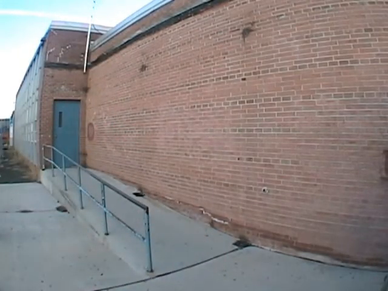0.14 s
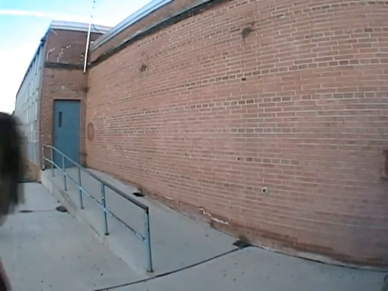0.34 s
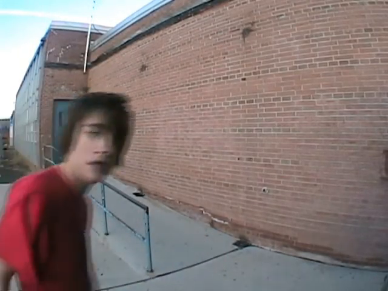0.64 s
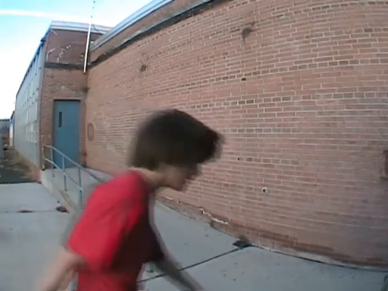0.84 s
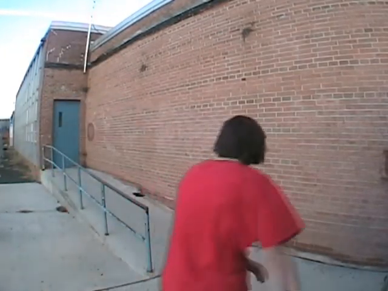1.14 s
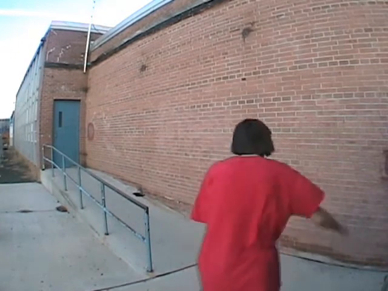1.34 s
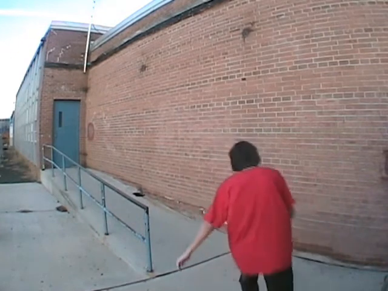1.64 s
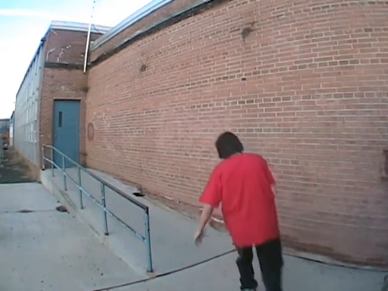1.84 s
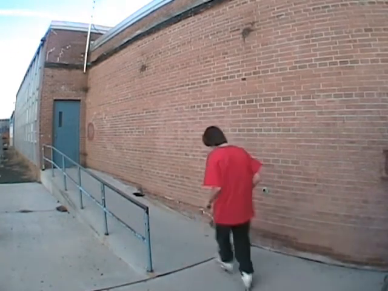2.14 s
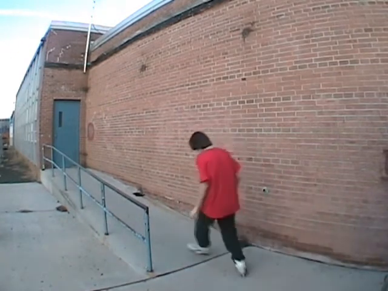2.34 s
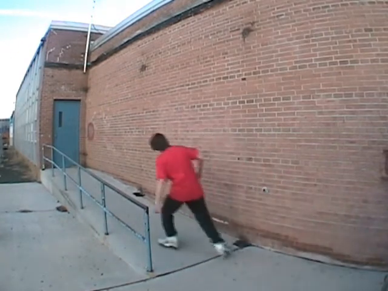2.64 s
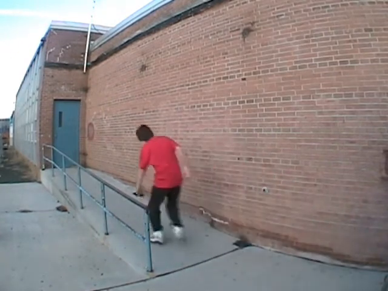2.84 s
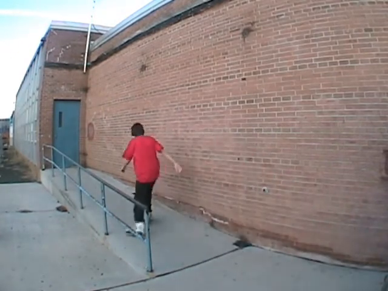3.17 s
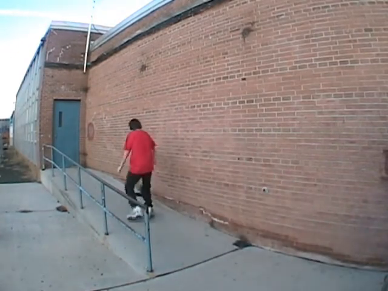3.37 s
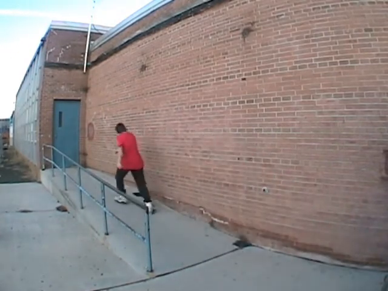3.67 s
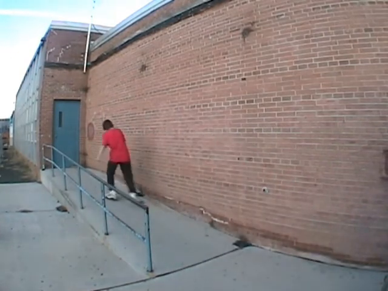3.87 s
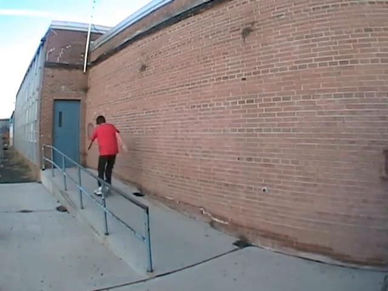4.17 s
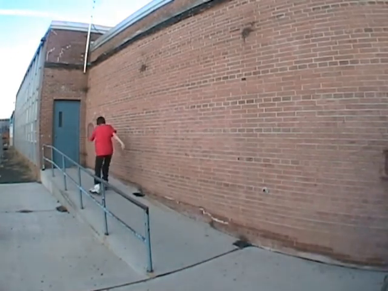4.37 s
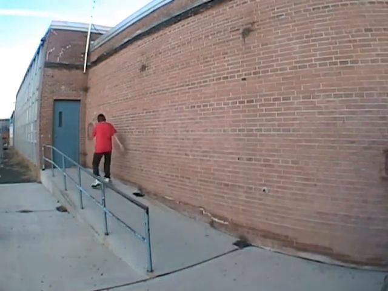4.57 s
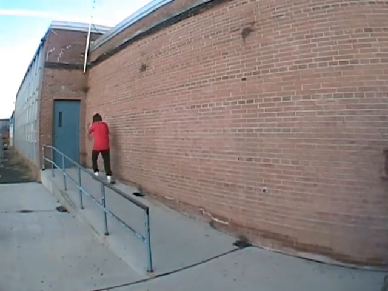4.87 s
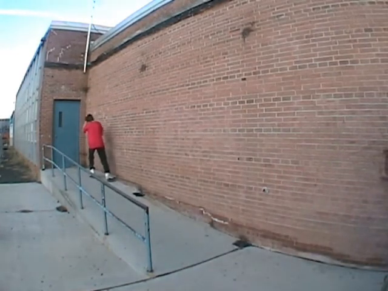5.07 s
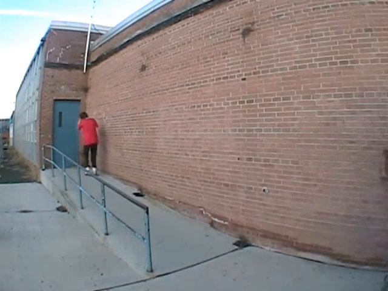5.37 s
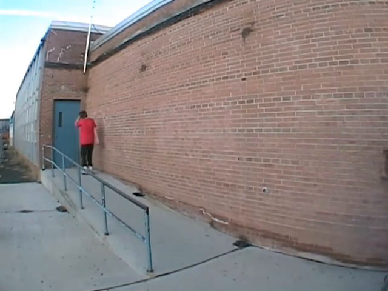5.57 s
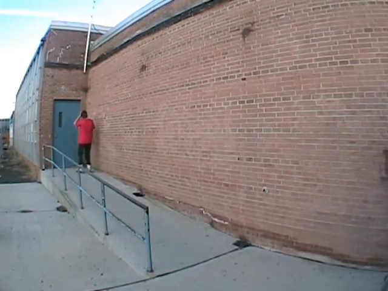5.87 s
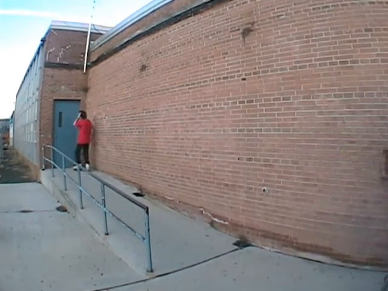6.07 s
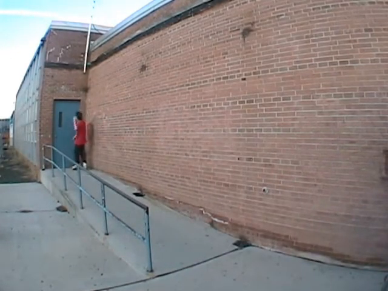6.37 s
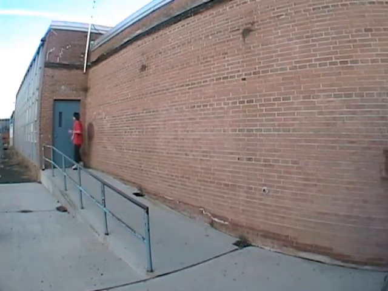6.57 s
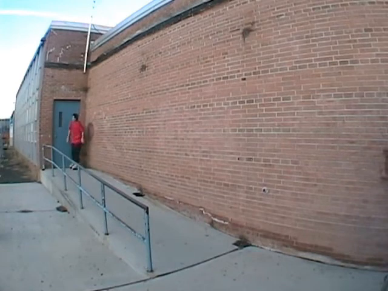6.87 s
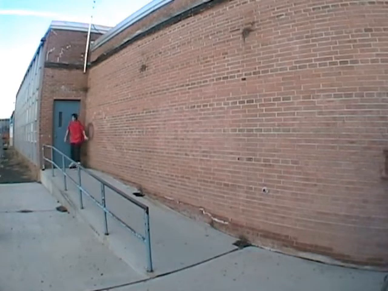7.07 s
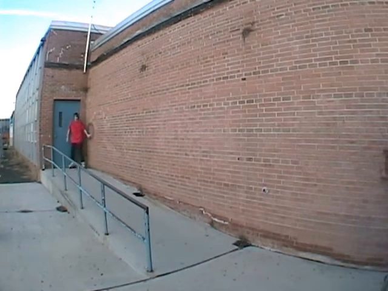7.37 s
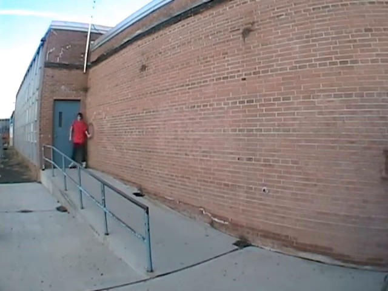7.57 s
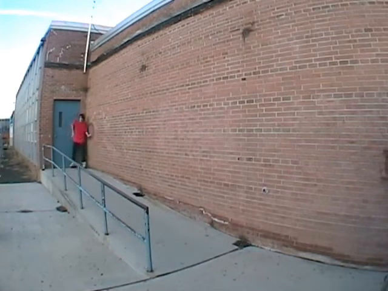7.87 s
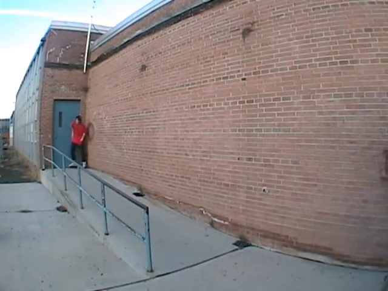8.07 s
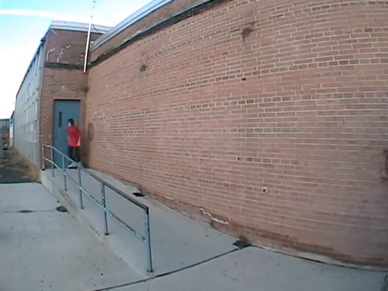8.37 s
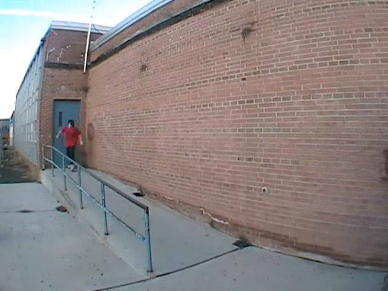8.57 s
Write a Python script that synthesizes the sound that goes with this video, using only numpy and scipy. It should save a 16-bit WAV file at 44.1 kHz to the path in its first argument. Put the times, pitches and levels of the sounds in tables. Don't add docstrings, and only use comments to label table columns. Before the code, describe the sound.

Skate wheels rumble and hiss over gritty concrete, then hard clacking stamps and short scrapes climb a ramp beside an echoing brick wall.

```python
import sys
import numpy as np
from scipy import signal
from scipy.fft import rfft, irfft, next_fast_len
from scipy.io import wavfile

SR = 44100
rng = np.random.default_rng(int(sys.argv[2]) if len(sys.argv) > 2 else 0)


def transcribe(u):
    v = np.clip(np.atleast_2d(u).T, -1, 1)
    q = np.round(v * 32767).astype(np.int16)
    wavfile.write(sys.argv[1], SR, q)


def boost_factor(decibels):
    exponent = np.asarray(decibels, float) / 20
    return 10 ** exponent


N = 384111


def rms_one(x):
    return x / np.sqrt(np.mean(x ** 2) + 1e-20)


def peak_one(x):
    return x / np.max(np.abs(x))


def add(track, s, x):
    at = round(s * SR)
    track[at:at + len(x)] += x[:N - at]


def in_time(rows):
    s, *columns = np.transpose(rows)
    return [np.interp(np.arange(N) / SR, s, c) for c in columns]


def swells(rows):
    t = np.arange(N) / SR
    return sum(db * np.exp(-((t - s) / max(half_s, .01)) ** 2) for s, db, half_s in rows)


def drift(rate_hz):
    r = np.exp(-80 * np.pi * rate_hz / SR)
    noise = rng.standard_normal(N // 40 + 2002)
    slow = signal.lfilter([1], [1, -2 * r, r * r], noise)[2000:]
    return np.interp(np.arange(N) / 40, np.arange(len(slow)), rms_one(slow))


def grains(shape, share, spread_db):
    size_db = spread_db * np.minimum(rng.exponential(1, shape), 5)
    sizes = boost_factor(size_db) * rng.choice([-1, 1], shape)
    return sizes * (rng.random(shape) < share) + 1e-18


def coloured(x, points):
    size = next_fast_len(N)
    hz = np.maximum(np.fft.rfftfreq(size, 1 / SR), 1)
    point_hz, point_db = np.transpose(points)
    gain = boost_factor(np.interp(np.log(hz), np.log(point_hz), point_db))
    return irfft(rfft(x, size) * gain, size)[..., :N]


def soften(x, hz):
    return signal.sosfilt(signal.butter(2, min(hz, 20000), fs=SR, output="sos"), x)


def resonate(x, modes):
    out = 0
    for k, (hz, width_hz, level_db) in enumerate(modes):
        r = np.exp(-np.pi * width_hz / SR)
        b = (1 - r * r) / 2 * np.array([1, 0, -1])
        a = [1, -2 * r * np.cos(2 * np.pi * hz / SR), r * r]
        out = out + (-1) ** k * boost_factor(level_db) * signal.lfilter(b, a, x)
    return out


# [f/Hz, level/dB per Hz]
AIR_SPECTRUM = [(32, -14), (64, -5), (125, 1), (220, -6), (400, -10.5), (750, -21), (1000, -16.5),
                (1400, -22.5), (2200, -33.5), (2600, -56), (4200, -45), (5000, -38), (7500, -48),
                (14500, -51)]
# [t/s, level/dB]
TRAFFIC_LEVEL = [
    (0.0, -43),
    (0.9, -42),
    (4.0, -37),
    (8.71, -42.5),
]
# [t/s, swell/dB, half length/s]
VEHICLES = [(.85, 2, 0.2), (2.3, 1, 0.17), (3.45, -0.5, 0.26), (4.5, 1, 0.37), (5.0, 7, 0.051),
            (5.7, 5, 0.35), (6.35, 6, 0.2), (7.4, 4.5, 0.49), (8.7, 6.5, 0.77)]
# [t/s, lower line level/dB, upper line level/dB]
HUM_LEVEL = [
    (0, -64, -42.5),
    (1, -47, -42),
    (2, -47.5, -60),
    (4, -49, -62),
    (8.71, -50, -64),
]
# [f/Hz, level/dB]
TAPE_WHINE = [(3136, -64.5), (4931, -67), (5378, -73), (5927, -94), (6180, -71), (6374, -69), (6487, -113),
              (7214, -107), (8166, -79)]


def street():
    air = rms_one(coloured(rng.standard_normal(N), AIR_SPECTRUM))
    bass = soften(air, hz=320)
    swell = boost_factor(in_time(TRAFFIC_LEVEL)[0] + swells(VEHICLES) + 1.0 * drift(6.4))
    hum_hz = (363, 408)
    lines = [(hz, db, .7) for hz, db in zip(hum_hz, in_time(HUM_LEVEL))]
    lines += [(hz, db, 1.5) for hz, db in TAPE_WHINE]
    t, tones = np.arange(N) / SR, 0
    for hz, level_db, waver_rad in lines:
        level = boost_factor(level_db + 2.0 + 1.2 * drift(9))
        tones = tones + level * np.sin(2 * np.pi * hz * t + waver_rad * drift(14))
    return swell * bass + boost_factor(-36) * (air - bass) + tones


# [f/Hz, width/Hz, level/dB]
FRAME_MODES = [(1300, 394, 0), (1700, 614, 2.5), (1958, 420, 3), (3100, 3550, -16)]
# [f/Hz, width/Hz, level/dB]
BOOT_MODES = [(270, 172, -3.5), (436.5, 70, -1), (511, 117, -6)]
# [f/Hz, width/Hz, level/dB]
WHEEL_MODES = [(640, 800, -13.5), (970, 178, 0.5)]
# [f/Hz, level/dB per Hz]
GRIT_SPECTRUM = [(2200, -40), (2700, 8), (3400, 5), (4400, 7), (6000, 0), (9000, -5), (11500, -28),
                 (15000, -40)]
# [t/s, rumble level/dB]
ROLLING_LOAD = [(0.0, -42.5), (0.29, -41), (0.51, -35), (0.75, -39), (0.93, -47.5), (1.11, -38),
                (1.6, -39.5), (1.82, -34.5), (2.57, -38), (2.81, -44), (3.8, -43), (4.51, -47.5),
                (5.07, -42.5), (5.29, -46.5), (5.75, -43.5), (6.48, -46.5), (6.72, -48.5), (8.71, -49.5)]
# [t/s, swell/dB, half length/s]
PUSH_OFFS = [(0.0, 5.5, 0.11), (.51, 5.5, 0.23), (1.03, 7.5, 0.34), (1.65, 7.5, 0.22), (2.42, 7.5, 0.33),
             (3.85, 4.5, 0.22), (4.65, -1, 0.12), (5.07, 3, 0.091), (6.48, 9, 0.19), (7.18, 2, .1)]


def rolling():
    rumble_db, push_db = in_time(ROLLING_LOAD)[0], swells(PUSH_OFFS)
    contacts = grains(N, share=.12, spread_db=2.5) * boost_factor(1.0 * drift(13) + 1.6 * drift(50))
    crackle = grains(N, share=0.024 * boost_factor(1.8 * drift(30)), spread_db=2.0)
    frame = rms_one(resonate(contacts, WHEEL_MODES + FRAME_MODES))
    boot = rms_one(resonate(contacts, BOOT_MODES))
    hiss = rms_one(coloured(rms_one(crackle) + 1.2 * rms_one(contacts), GRIT_SPECTRUM))
    mean_load_db, boot_mean_db, hiss_rel_db = -41, -45.5, -13
    boot_db = boot_mean_db + 0.67 * (rumble_db - mean_load_db) + 0.72 * push_db
    hiss_db = rumble_db + hiss_rel_db + push_db
    return boost_factor(rumble_db) * frame + boost_factor(boot_db) * boot + boost_factor(hiss_db) * hiss


# [t/s, level/dB]
SQUEAL_LEVEL = [
    (.42, -70),
    (.49, -46),
    (.56, -44),
    (.7, -52),
    (.82, -61),
    (.9, -82),
]
# [f/Hz, width/Hz, level/dB]
RASP_MODES = [(2620, 280, 1), (3200, 1100, -3.5), (3830, 400, 1)]
# [t/s, level/dB]
RASP_SWELL = [(0, -48), (.2, -49), (.45, -51), (.55, -45), (.75, -52), (.88, -71), (1.2, -80)]


def squeal():
    phase = 2 * np.pi * 3950 * np.arange(N) / SR
    tone = drift(130) * np.cos(phase) + drift(130) * np.sin(phase)
    rasp = resonate(grains(N, share=0.22, spread_db=1.5), RASP_MODES)
    rasp = rms_one(soften(rasp, hz=4200))
    return boost_factor(in_time(SQUEAL_LEVEL)[0]) * tone + boost_factor(in_time(RASP_SWELL)[0]) * rasp


def crushed(rows, fall_s):
    out, t = np.zeros(N), np.arange(900) / SR
    for (s, peak_db, hz), hiss in zip(rows, rng.standard_normal((len(rows), len(t)))):
        burst = hiss * np.exp(-t / fall_s)
        add(out, s, boost_factor(peak_db) * peak_one(resonate(burst, [(hz, 550, 0), (7500, 5000, -14)])))
    return out


# [t/s, peak level/dB, f/Hz]
SAND_SPECKS = [(0.1064, -41, 3500), (1.0214, -40, 4720), (1.0565, -35, 3610), (1.065, -35, 4270),
               (1.0804, -37, 4030), (1.0974, -41, 3750), (1.1288, -38, 3940), (1.1563, -35, 3640),
               (1.1837, -36, 4890), (1.2456, -32, 3670), (1.2734, -40, 3650), (1.3089, -31, 4800),
               (1.3564, -37, 4020), (1.3744, -40, 5150), (1.487, -35, 4600), (1.498, -33, 4480),
               (1.5684, -42, 3570), (1.5753, -34, 3540), (1.604, -36, 3990), (1.654, -29, 3700),
               (1.6771, -33, 3920), (1.7694, -34, 3840), (1.7968, -34, 3790), (1.8068, -30, 3660),
               (1.8424, -35, 4490), (1.8572, -35, 4150), (1.8854, -34, 3830), (1.9051, -33, 3630),
               (1.9315, -35, 3850), (1.9525, -37, 4180), (2.1154, -17, 6260), (2.1224, -23, 4630),
               (2.2434, -35, 3950), (2.5954, -37, 3520), (2.7706, -38, 3740), (4.9462, -41, 3570),
               (5.1274, -39, 3840), (5.4314, -36, 3660), (5.6351, -37, 3910), (7.2025, -21, 6550),
               (7.2484, -38, 3620)]
# [t/s, peak level/dB, f/Hz]
STRAY_GRAINS = [(0.2962, -32, 3730), (0.3074, -42, 3140), (0.3252, -39, 3910), (0.3431, -36, 3700),
                (0.3594, -36, 3140), (0.4144, -31, 3160), (0.4354, -35, 3420), (0.6954, -37, 3920),
                (0.8194, -39, 3770), (0.8654, -45, 4930), (3.1124, -42, 3510), (3.684, -42, 3310),
                (3.924, -37, 3130), (3.9614, -43, 3000), (3.9853, -43, 4940), (4.7614, -38, 3150),
                (4.8813, -39, 3140), (7.6331, -37, 3250)]
# [t/s, peak level/dB, f/Hz]
SAND_SPRAY = [(.5, -39, 3950), (.54, -34, 3950), (.6, -37, 3900), (1.73, -32, 4300), (1.755, -33, 4200),
              (5.088, -36, 4900), (5.112, -37, 4900), (5.124, -35, 5000), (5.52, -34, 4800),
              (5.6, -41, 4700), (5.632, -38, 4600), (5.655, -40, 4770), (7.2175, -32, 3050),
              (7.228, -34, 3050), (7.309, -30, 4760), (8.164, -25, 3000), (5.002, -36, 3000),
              (5.3, -35, 3100), (5.87, -41, 3100)]


def sand():
    specks = crushed(SAND_SPECKS, fall_s=.0016) + crushed(STRAY_GRAINS, fall_s=.0016)
    return specks + crushed(SAND_SPRAY, fall_s=0.0057)


# [t/s, peak level/dB, f/Hz]
GRIT_TICKS = [(0.0376, -32, 3100), (0.2706, -21.5, 2950), (0.423, -31, 4300), (0.58, -30, 3990),
              (0.726, -30, 3640), (0.92, -22.5, 4800), (1.2214, -39, 3680), (1.2616, -30, 4730),
              (1.418, -30, 3900), (1.4307, -26, 4400), (1.8326, -29, 3010), (2.0872, -17, 3600),
              (2.148, -36, 3150), (2.349, -28.5, 4540), (2.6872, -27, 3560), (2.713, -33, 3880),
              (2.724, -28, 2920), (2.751, -34, 4730), (2.801, -35, 3400), (3.187, -37, 4450),
              (3.229, -31, 6950), (5.1057, -35, 4700), (7.1106, -35.5, 4500), (7.223, -28, 2980),
              (7.243, -30, 3000), (7.276, -31, 8660), (7.3098, -29, 8400), (7.5785, -30, 3130),
              (8.1615, -22.5, 3020), (8.7, -41, 6000)]


def grit_ticks():
    return crushed(GRIT_TICKS, fall_s=0.0035)


# [f/Hz, width/Hz, level/dB]
DRAG_MODES = [(1350, 240, 0), (1700, 660, -3.5), (2090, 290, 1.5), (3050, 630, -13), (4900, 1000, -19),
              (7500, 5000, -35)]
# [t/s, length/s, level/dB, slip rate/Hz]
SKIDS = [(0.481, 0.13, -39, 640), (1.657, 0.27, -36, 810), (1.878, 0.3, -41, 560), (2.269, 0.4, -40, 400),
         (2.175, 0.12, -34.5, 240), (3.209, 0.051, -28.5, 220), (4.459, 0.038, -35, 150),
         (4.81, 0.033, -48, 260), (4.92, 0.17, -47, 200), (4.994, 0.048, -41, 150),
         (5.081, 0.083, -37, 156), (5.407, 0.036, -30, 250), (5.54, 0.055, -33.5, 320),
         (5.801, 0.22, -42, 180), (6.347, 0.15, -49, 170), (6.478, 0.05, -37, 190),
         (6.537, 0.071, -35.5, 230), (7.189, 0.067, -41, 360), (8.322, 0.047, -43, 82)]


def scuffs():
    out, size = np.zeros(N), 15000
    t = np.arange(size) / SR
    spray_fall = np.exp(-1 / (0.0046 * SR))
    for s, length_s, level_db, slips_hz in SKIDS:
        slips = np.abs(grains(size, share=slips_hz / SR, spread_db=2.5))
        force = .5 + signal.lfilter([1], [1, -spray_fall], slips)
        spray = force * rng.standard_normal(size)
        stroke = np.sin(np.pi * np.minimum(t / length_s, 1)) ** .5
        add(out, s, boost_factor(level_db) * stroke * rms_one(soften(resonate(spray, DRAG_MODES), hz=7950)))
    return out


def knocks(rows):
    out, t = np.zeros(N), np.arange(4000) / SR
    chatter = grains((len(rows), len(t)), share=.15, spread_db=2.5)
    chatter[:, 45] = 1.75
    noise = rng.standard_normal((len(rows), len(t)))
    bright = signal.butter(2, [3000, 10500], "band", fs=SR, output="sos")
    for (s, peak_db, crack_db, hz, ms, thud_db), clicks, hiss in zip(rows, chatter, noise):
        ms = max(ms, 1)
        fall = (1 - np.exp(-t / (0.000093 * ms))) * np.exp(-t / (ms / 1000))
        frame = peak_one(soften(resonate(clicks * fall, FRAME_MODES + [(hz, 240, 5)]), hz=2840))
        foot_push = fall ** 3.3 * (1 + 1.46 * hiss)
        boot = peak_one(resonate(foot_push, BOOT_MODES))
        crack = peak_one(signal.sosfilt(bright, (clicks + 0.6 * hiss) * fall))
        add(out, s, boost_factor(peak_db) * (frame + boost_factor(thud_db + 6.5) * boot + boost_factor(crack_db + 3.0) * crack))
    return out


# [t/s, peak level/dB, crack rel. level/dB, frame f/Hz]
FRAME_RATTLES = [(7.1995, -20.5, -14, 1380), (7.205, -20, -6, 1450), (7.218, -24, -15, 1540),
                 (7.226, -26, -17, 1500), (7.245, -29, -10, 3030), (5.500, -15.5, -17, 1900),
                 (5.514, -17, -18, 2050), (5.431, -27, -11, 2100), (5.765, -28, -22, 1600),
                 (5.777, -23.5, -19, 3000), (6, -26, -20, 1600), (5.205, -28, -20, 2100),
                 (5.312, -30, -20, 1300), (5.158, -32, -20, 2100), (4.8, -29, -15, 2000),
                 (2.107, -7.5, -13, 1940), (2.123, -20, -14, 1900), (2.148, -20, -15, 1900),
                 (0.98, -29, -17, 1500), (1.358, -26, -15, 1700), (1.376, -28, -15, 1800),
                 (1, -28, -15, 1900), (1.4, -26, -15, 2100), (6.937, -31, -20, 1850),
                 (4.457, -20, -12, 1900), (3.558, -25, -12, 1600), (4.839, -25, -20, 1500),
                 (4.495, -24, -25, 1900), (5.006, -24, -20, 2050), (5.046, -26, -15, 2000),
                 (5.89, -28, -18, 1900)]


def rattles():
    chatter_ms, thud_db = 4, -37
    return knocks([(*row, chatter_ms, thud_db) for row in FRAME_RATTLES])


# [t/s, peak level/dB, crack rel. level/dB, frame f/Hz]
CRACK_CROSSINGS = [(0.0405, -21.5, -33, 2430), (0.2687, -22.5, -33, 1270), (0.325, -24, -26, 1530),
                   (1.157, -44, -17, 1850), (1.186, -27, -29, 1700), (1.2451, -25.5, -22, 1360),
                   (1.4384, -24.5, -18, 1250), (1.487, -25, -13, 1520), (1.579, -24.5, -19, 1320),
                   (1.682, -22, -32, 1430), (1.931, -23, -25, 2080), (1.9602, -21.5, -27, 1240),
                   (2.774, -29.5, -12, 1170)]
# [t/s, peak level/dB, crack rel. level/dB, frame f/Hz]
RAMP_SHUFFLES = [(3.342, -39, -4, 1010), (3.6121, -25, -18, 1820), (3.8612, -33, -26, 1270),
                 (4.878, -33.5, -9, 1350), (4.925, -28, -22, 1350), (5.0057, -24.5, -26, 1410),
                 (5.02, -23, -32, 2070), (5.04, -26, -27, 1380), (5.087, -28.5, -9, 2070),
                 (5.1238, -28, -17, 1270), (5.296, -21.5, -23, 1420), (5.411, -21, -25, 1320),
                 (5.9155, -23, -34, 1900), (6.0055, -30, -38, 1300), (6.17, -33, -32, 1420),
                 (6.3757, -23.5, -27, 1700), (6.484, -24, -40, 1350), (6.55, -26, -20, 1380),
                 (6.5654, -22.5, -19, 1350), (7.0351, -25, -8.5, 1340), (7.2927, -35, -19, 1310),
                 (7.581, -36, -21, 1370), (7.849, -34.5, -8, 3100), (8.1616, -27.5, -11, 2920)]
# [t/s, peak level/dB, crack rel. level/dB, frame f/Hz]
WHEEL_TOUCHES = [(2.1105, -7, -16, 2250), (2.1174, -21, -13, 1300), (3.2082, -22, -25, 1740),
                 (4.477, -22, -14, 1930), (4.492, -36, -23, 1900), (2.096, -11.5, -25, 1900),
                 (3.487, -26.5, -1, 1600), (4.7409, -26.5, -4.5, 1790), (5.42, -31, -9, 2020),
                 (5.5089, -17.5, -18, 1980), (5.5604, -29, -12, 1820), (5.575, -25, -32, 1700),
                 (6.911, -38, -17, 1200)]
# [t/s, peak level/dB, crack rel. level/dB, frame f/Hz, chatter/ms]
HARD_LANDINGS = [(0.9028, -9.5, -18, 1590, 5.4), (0.9533, -11, -10, 1620, 8.8),
                 (1.6419, -22, -10.5, 1300, 4.7), (2.0883, -6, -35, 2050, 6.1),
                 (2.102, -1.5, -7, 1220, 4.4), (2.1878, -15, -32, 1750, 7.9),
                 (2.5585, -14.5, -21, 2160, 6.4), (2.6324, -8.5, -14.5, 1850, 5.3),
                 (3.2135, -12.5, -19, 1450, 7.6), (3.494, -19, -12, 1700, 9.1),
                 (3.5625, -18, -11.5, 1530, 3.8), (3.7902, -16, -27, 1490, 4.6),
                 (3.805, -13, -16.5, 1780, 6.7), (4.4605, -12, -17, 1740, 9.7),
                 (4.7197, -20, -8, 1550, 6.2), (4.8199, -21, -16.5, 1480, 11),
                 (5.1852, -16.5, -17.5, 1590, 7.6), (5.4936, -11, -20, 2080, 7.4),
                 (5.77, -22.5, -30, 1620, 9.4), (6.9245, -13.5, -18.5, 1680, 4.7),
                 (7.1991, -30, -6, 1440, 11), (7.5098, -21.5, -17.5, 1590, 4.9),
                 (8.313, -14.5, -25, 1300, 4.8), (8.698, -12, -25, 1950, 12)]


def footfalls():
    rows = [(*row, -13) for row in HARD_LANDINGS]
    rows += [(*row, 6.9, -38) for row in CRACK_CROSSINGS]
    rows += [(*row, 5.7, -10) for row in RAMP_SHUFFLES]
    rows += [(*row, 8, -6) for row in WHEEL_TOUCHES]
    return knocks(rows)


# [t/s, peak level/dB, f/Hz, upper partial rel. level/dB]
FULL_STAMPS = [(0.953, -6.5, 348, -9), (0.92, -19, 408, -17), (1.643, -15, 322, -21),
               (2.088, -12, 384, -10), (2.103, 0, 288, -17.5), (2.633, -8.5, 322, -9),
               (2.638, -4.5, 273, -5), (3.214, -10.5, 270, -1), (3.789, -17, 400, -22),
               (3.806, -10, 356, -25), (4.46, -15, 420, -5), (5.564, -24, 387, -18), (6.927, -38, 246, -11),
               (7.509, -16.5, 232, 0), (8.314, -27, 382, -1)]


def stamps():
    out, t = np.zeros(N), np.arange(3000) / SR
    push = np.sin(np.pi * np.minimum(t / 0.0011, 1))
    for s, peak_db, hz, upper_db in FULL_STAMPS:
        ring = resonate(push, [(hz, 75, 0), (2.04 * hz, 120, upper_db)])
        add(out, s, boost_factor(peak_db - 1.5) * peak_one(ring))
    return out


# [t/s, level/dB]
WALL_ECHOES = [
    (0.015, -5),
    (0.031, -7.5),
    (.061, -11.5),
    (0.095, -15.5),
]


def wall(x):
    t = np.arange(5000) / SR
    reply = sum(boost_factor(db) * (t > s) * np.exp(-np.abs(t - s) / 0.0053) for s, db in WALL_ECHOES)
    shared, own = reply * rng.standard_normal((2, len(t)))
    reply = signal.lfilter([.45], [1, -.55], shared + 0.34 * own * [[1], [-1]]) * boost_factor(-26.5)
    x = signal.sosfilt(signal.butter(1, 600, "high", fs=SR, output="sos"), x)
    return signal.fftconvolve(x[None], reply, axes=1)[:, :N]


# [f/Hz, level/dB]
PORT_OWN = [(40, -35), (300, -15), (700, -2.5), (1500, -9.5), (5000, -11), (10000, -5.5), (12500, -9.5)]


def scene():
    steady = street() + rolling()
    diffuse = coloured(street() + rolling(), PORT_OWN)
    blows = sand() + grit_ticks() + scuffs() + rattles() + footfalls() + stamps()
    blows = soften(soften(blows, hz=11200), hz=11200)
    blows = signal.sosfilt(signal.butter(2, 170, "high", fs=SR, output="sos"), blows)
    return blows + wall(blows) + squeal() + steady + diffuse * [[1], [-1]]


def roll_off(x):
    return signal.sosfilt(signal.butter(12, 15000, fs=SR, output="sos"), x)


# [f/Hz, width/Hz, level taken out/dB]
HOUSING_DIPS = [(718, 176, -10), (2530, 680, -8.5)]
# [f/Hz, level/dB]
LEFT_BALANCE = [(60, 0.5), (140, 0.0), (340, -1.5), (810, -0.5), (1930, -1.0), (4590, -1.0), (10900, -2)]


def record(dry):
    for dip in HOUSING_DIPS:
        dry = dry - resonate(dry, [dip])
    size = next_fast_len(N + 4096)
    hz = np.fft.rfftfreq(size, 1 / SR)
    turn_hz, lag_s = 76, 3.3e-5
    lead_rad = 2 * np.arctan2(turn_hz, hz)
    lag_rad = np.minimum(2 * np.pi * hz * lag_s * (1 + (hz / 40000) ** 2), 2.65)
    balance_hz, balance_db = np.transpose(LEFT_BALANCE)
    balance = boost_factor(np.interp(np.log(hz + 1), np.log(balance_hz), balance_db))
    left = irfft(rfft(dry[0], size) * balance * np.exp(1j * (lead_rad - lag_rad)), size)[:N]
    return roll_off(np.clip([left, dry[1]], -1, 1))


dry = scene()
out = record(dry)
transcribe(out)
```